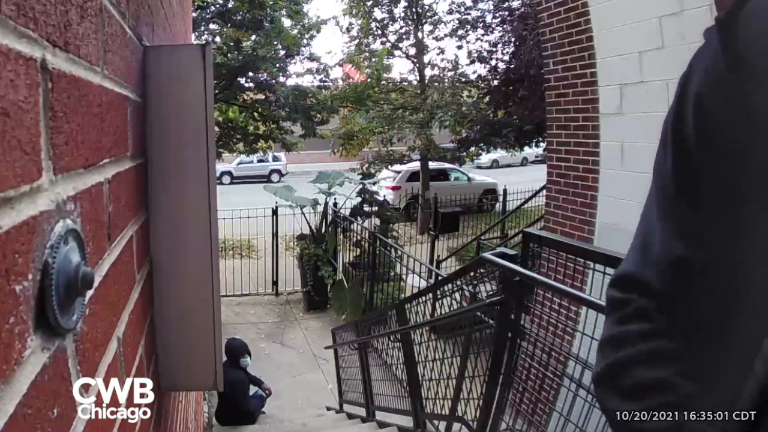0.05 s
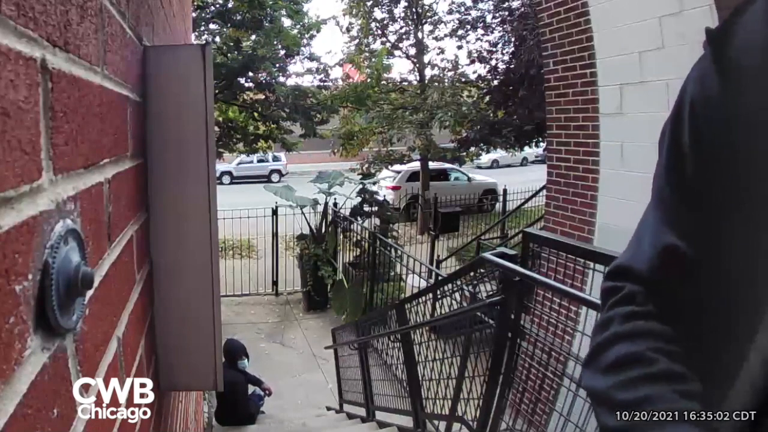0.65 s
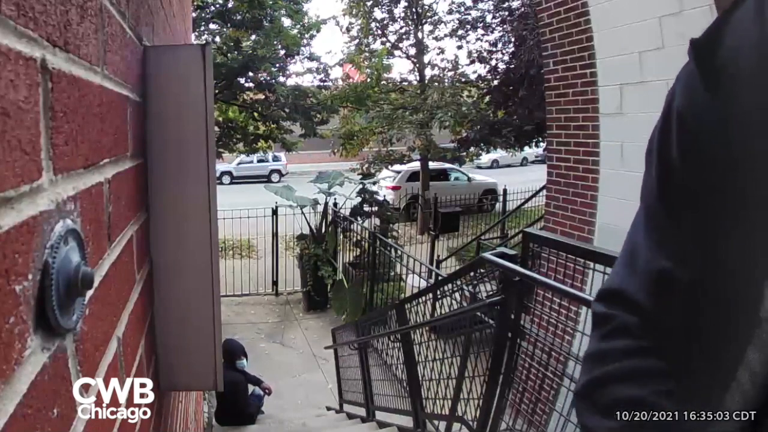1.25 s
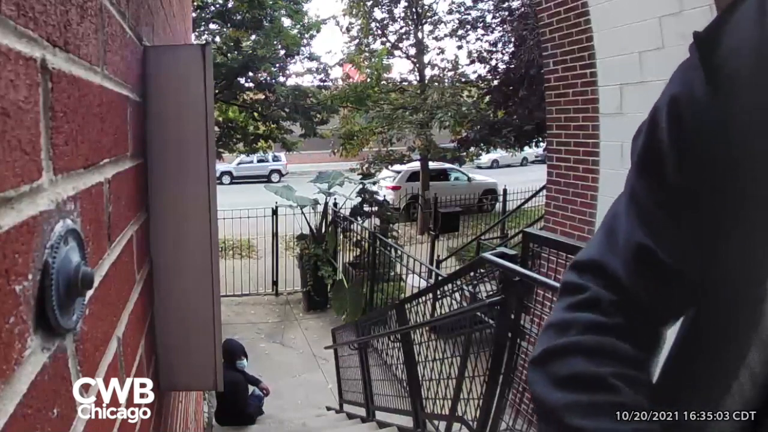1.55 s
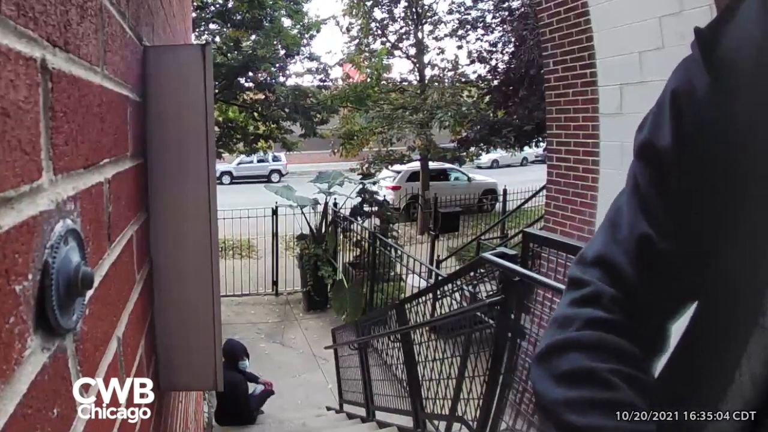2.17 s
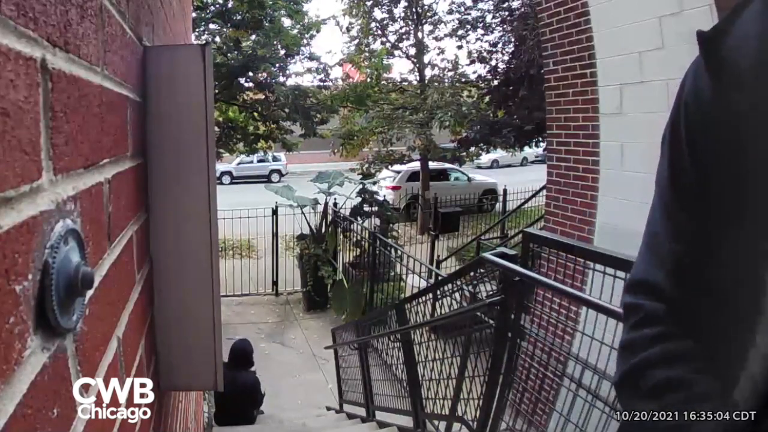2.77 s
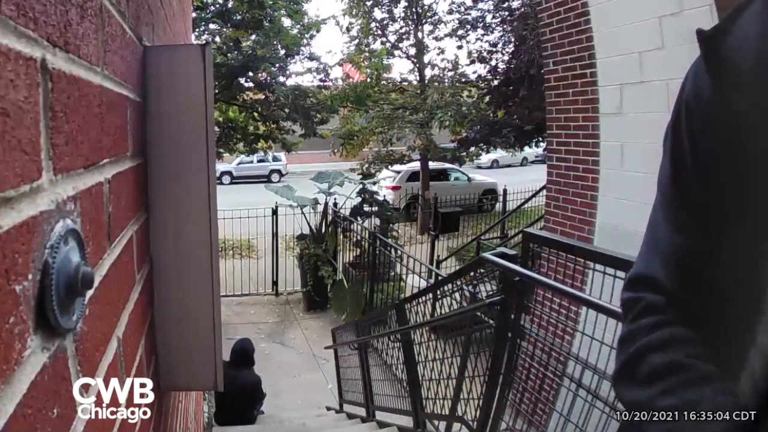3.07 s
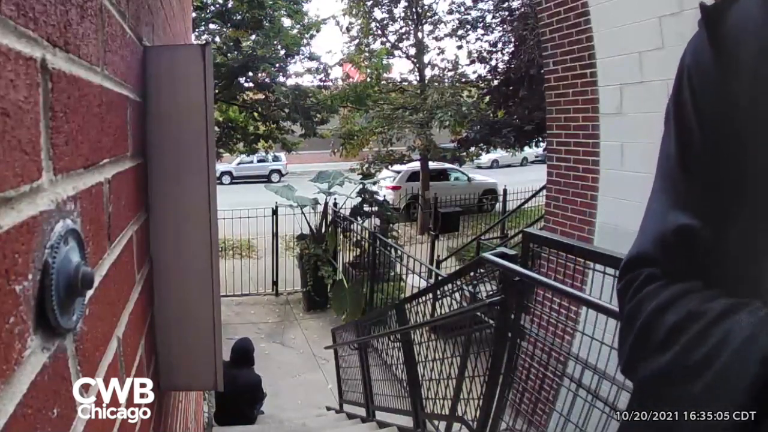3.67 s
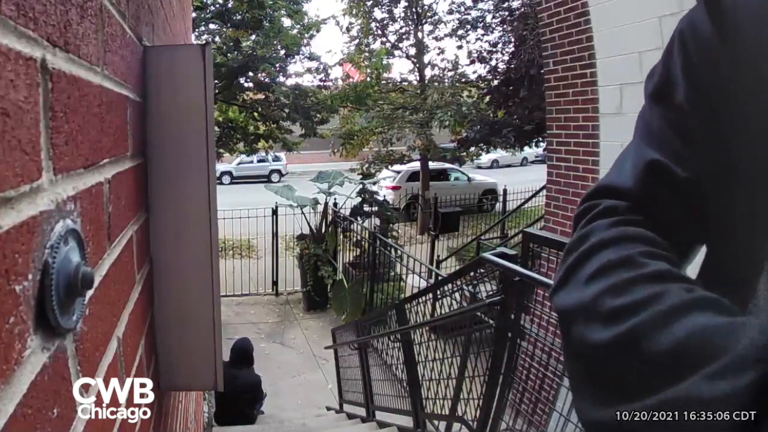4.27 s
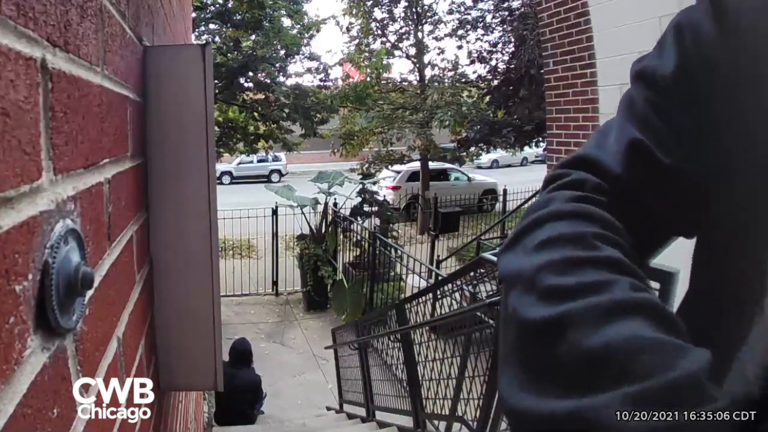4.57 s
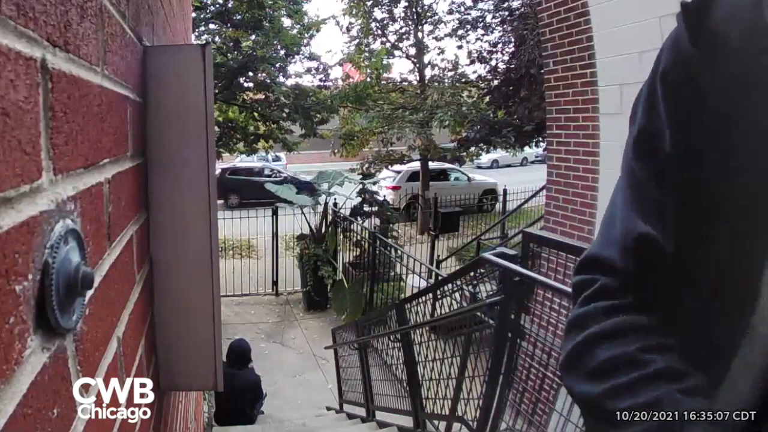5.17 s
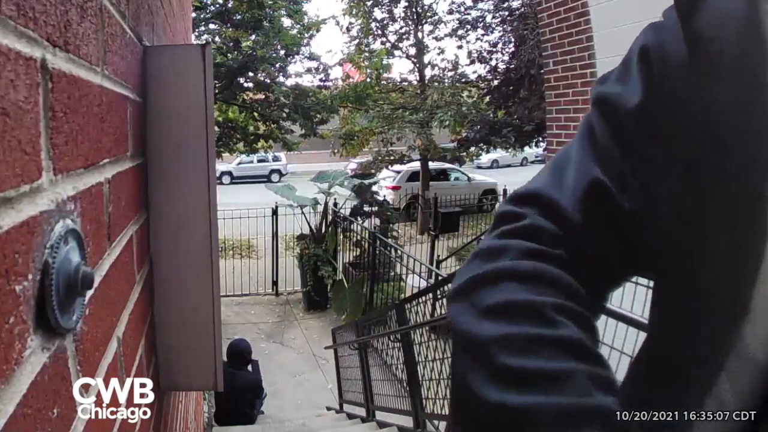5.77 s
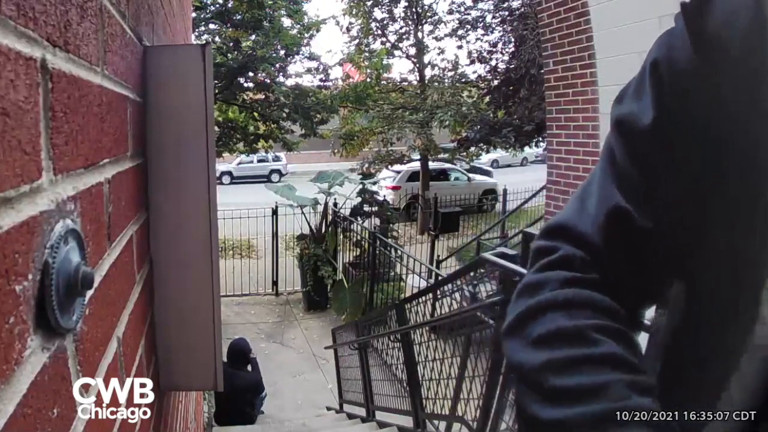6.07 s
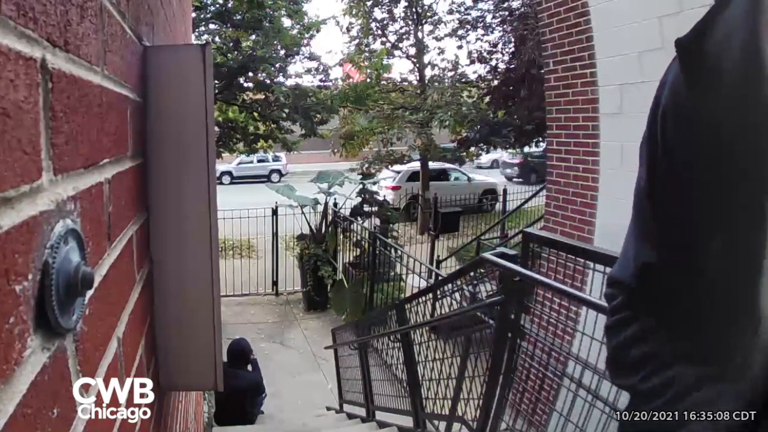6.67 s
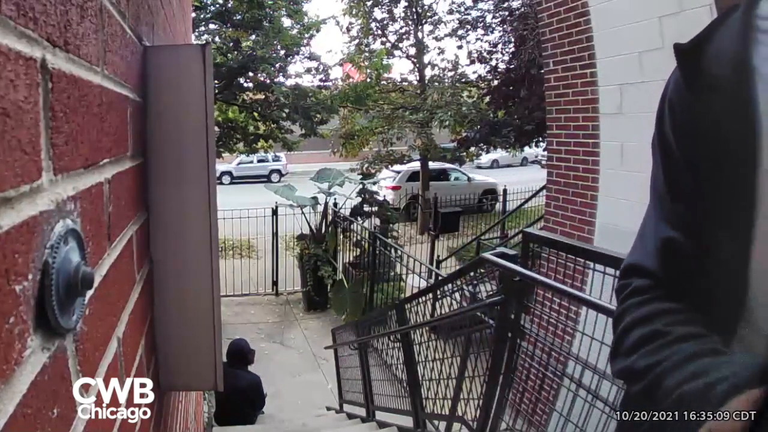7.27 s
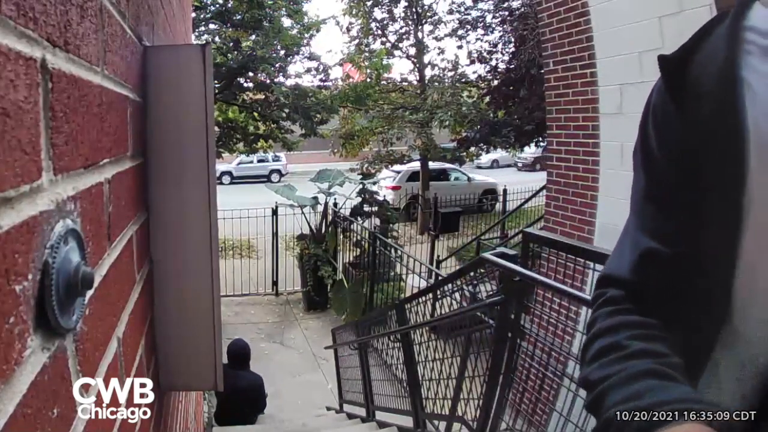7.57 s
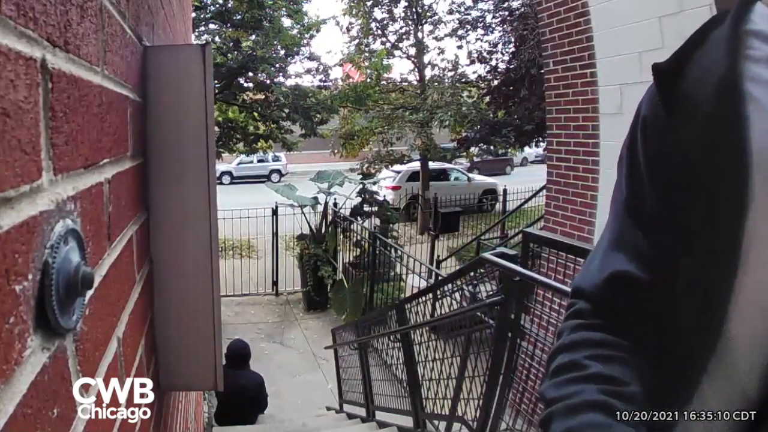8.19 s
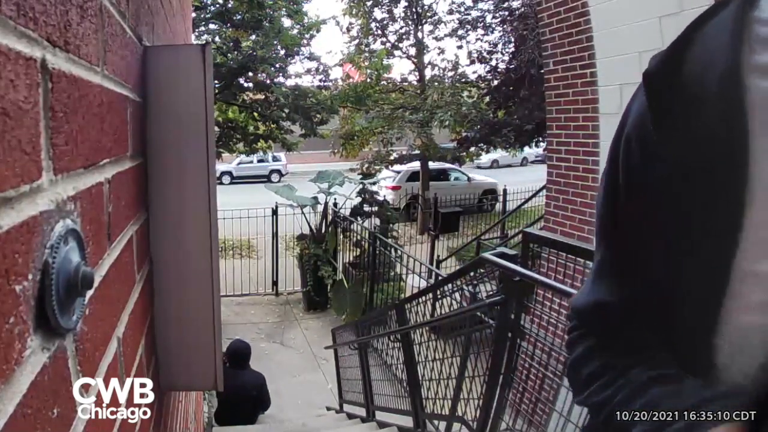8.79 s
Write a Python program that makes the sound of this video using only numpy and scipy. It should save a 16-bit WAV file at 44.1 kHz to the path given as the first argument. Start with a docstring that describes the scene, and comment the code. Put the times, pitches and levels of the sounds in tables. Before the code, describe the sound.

Someone forces a door outdoors with a steel bar, heard from very near. The tool slips with loud metallic clacks and wooden knocks, creaks once, and the door thuds lightly in its frame. After a short pause a second run of snaps and rasping scrapes begins, while a car goes by over low traffic noise. Toward the end only small ticks, a soft rustle of clothing and a distant engine remain.

```python
"""Brick porch, close to a small door camera: a steel pry bar is worked into a house door.
The bar snaps, skids and once creaks against lock and frame; each slip rings the steel and knocks the door.
In between, the bar scrapes, the door leaf bumps, and soft hiss swells: cloth rustle, wash after loud snaps.
Behind it, street traffic roars and hisses: a car passes, and an engine drones toward the end."""
import sys
import numpy as np
from scipy import signal
from scipy.fft import rfft, irfft, next_fast_len
from scipy.io import wavfile
from scipy.ndimage import uniform_filter1d, map_coordinates

SR = 44100
rng = np.random.default_rng(int(sys.argv[2]) if len(sys.argv) > 2 else 0)


def master(y):
    """Save y as 16-bit WAV."""
    cut = np.clip(np.atleast_2d(y).T, -1, 1)
    pcm = np.round(cut * 32767)  # scale
    wavfile.write(sys.argv[1], SR, pcm.astype(np.int16))


N = 398399

# spectrum of one bar contact: f/contact pitch, level/dB
CLACK_SPECTRUM = [(.2, -55.5), (0.421, -18.5), (.6, -2), (0.8, 3), (1.001, 5), (1.4, -1.5), (1.901, -8.5),
                  (2.6, -24.5), (4, -45.5)]


def amp(db):
    """Decibels to gain."""
    return 10 ** (np.asarray(db) / 20)


def unit(x):
    """Scale to rms 1."""
    return x / np.sqrt(np.mean(x ** 2) + 1e-20)


def burst(x, db):
    """Give x the energy of 10 ms at this level."""
    return amp(db) * x / np.sqrt(np.sum(x ** 2) / (SR / 100) + 1e-20)


def along(points, hz):
    """Read (f/Hz, value) points on a log axis."""
    f, values = np.transpose(points)
    return np.interp(np.log(np.maximum(hz, f[0])), np.log(f), values)


def curve(points):
    """Read (t/s, value) points at every sample."""
    return np.interp(np.arange(N) / SR, *np.transpose(points))


def swell(at_s, length_s):
    """Bell-shaped rise and fall."""
    return np.exp(-2 * ((np.arange(N) / SR - at_s) / length_s) ** 2)


def wobble(rate_hz):
    """Smooth curve through random knots."""
    knots = rng.standard_normal(int(N * rate_hz / SR) + 4)
    return map_coordinates(knots, [np.arange(N) * rate_hz / SR])


def add(track, at_s, sound):
    """Mix a sound into the track."""
    part = track[max(round(at_s * SR), 0):][:len(sound)]
    part += sound[:len(part)]


def filtered(x, response):
    """Multiply the spectrum of x by response(f/Hz)."""
    size = next_fast_len(len(x) + SR // 8)
    return irfft(rfft(x, size) * response(np.fft.rfftfreq(size, 1 / SR)), size)[:len(x)]


def coloured(x, spectrum, scale=1, size=2048):
    """Minimum-phase filter shaped like the spectrum, its frequencies times scale."""
    gain = amp(along(spectrum, np.fft.rfftfreq(size, 1 / SR) / scale))
    cepstrum = irfft(np.log(gain))
    cepstrum[1:size // 2] *= 2
    cepstrum[size // 2 + 1:] = 0
    return signal.fftconvolve(x, irfft(np.exp(rfft(cepstrum))))[:len(x)]


def rush(spectrum, patchy_db):
    """Shaped noise of rms 1 with drifting patches of gain."""
    bins = signal.stft(rng.standard_normal(N), nperseg=1024)[2]
    patches = uniform_filter1d(rng.standard_normal(bins.shape), size=5, axis=0)
    patches = uniform_filter1d(patches, size=9, axis=1)
    noise = signal.istft(bins * amp(patchy_db * unit(patches)), nperseg=1024)[1][:N]
    return unit(filtered(noise, lambda hz: amp(along(spectrum, hz))))


def porch(x, wet_db):
    """Add the short tail between the brick walls."""
    # reverberation time: f/Hz, t60/s
    decay = [(150, .45), (600, 0.06), (2500, 0.29), (7000, 0.39)]
    hz, t, bins = signal.stft(rng.standard_normal(len(x)), SR, nperseg=256)
    tail = signal.istft(bins * amp(-60 * t / along(decay, hz)[:, None]), SR, nperseg=256)[1]
    return x + amp(wet_db) * signal.fftconvolve(x, tail / np.linalg.norm(tail))[:len(x)]


def street():
    """Road roar and tyre hiss of far traffic; one car crosses in front with a brighter roar."""
    # far roar and hiss, one list before the car and one after: t/s, level/dB
    far_roar = [
        [(0.0, -59), (0.64, -70), (1.67, -62), (2.0, -66), (4.7, -62)],
        [(6.1, -60.5), (6.24, -58.5), (7.86, -58), (8.14, -62), (9.03, -56)],
    ]
    far_hiss = [
        [(0.0, -63), (0.68, -74), (1.5, -66.5), (1.84, -69.5), (2.85, -60.5), (3.27, -70.5), (4.1, -63.5)],
        [(6.3, -63.5), (6.68, -60), (6.86, -65.5), (7.79, -70), (8.12, -66), (8.63, -68.5), (9.03, -61.5)],
    ]
    # spectra of far roar, near car and tyres: f/Hz, level/dB
    roar_spectrum = [(15, -51), (25, -23), (52, -13.5), (65, -15.5), (79, -9.5), (97, -17), (129, -11.5),
                     (206, -15.5), (240, -17.5), (356, -0.5), (493, 1.5), (706, -4.5), (824, -3.5),
                     (1330, -22.5), (1500, -21.5), (1950, -38.5), (3300, -120)]
    car_spectrum = [(200, -33), (400, 5.5), (800, 6), (1100, 0), (1500, -28), (3000, -66)]
    tyre_spectrum = [(700, -8), (1300, 2), (1800, 6), (2600, -1.5), (3600, -15), (6000, -36.5)]
    abreast_s, half_gain_s, car_roar_db, car_hiss_db = 5.37, 0.41, -48, -52.5
    near = 1 / (1 + ((np.arange(N) / SR - abreast_s) / half_gain_s) ** 2)
    roar = amp(curve(np.concatenate(far_roar))) * rush(roar_spectrum, patchy_db=0.5)
    roar += amp(car_roar_db) * near * rush(car_spectrum, patchy_db=0.5)
    hiss_gain = np.hypot(amp(curve(np.concatenate(far_hiss))), amp(car_hiss_db) * near ** 3.5)
    waver = amp(1.1 * wobble(12))
    return waver * roar + hiss_gain * rush(tyre_spectrum, patchy_db=1.5)


def whines():
    """Exhaust boom, engine whine and brake squeal: wavering tones that swell and fade."""
    # street tones: centre t/s, length/s, f/Hz, width/Hz, level/dB
    tones = [(2.1, .04, 1660, 45, -60.5), (2.266, 0.066, 1714, 44, -57.5), (2.746, 0.43, 1700, 91, -65),
             (2.847, 0.33, 1885, 106, -61), (3.277, 0.17, 169, 9.1, -67), (5.771, 0.39, 161.8, 7.4, -62.5),
             (7.653, 0.14, 192.5, 9.3, -61), (8.505, 0.78, 487.3, 15.4, -58),
             (8.802, 0.55, 423.5, 25.7, -59)]
    out = np.zeros(N)
    for at_s, length_s, hz, width_hz, db in tones:
        phase = 2 * np.pi * np.cumsum(hz + width_hz / 2 * wobble(2 * width_hz)) / SR
        flutter = amp(2.5 * wobble(width_hz))
        out += amp(db) * flutter * swell(at_s, length_s) * np.sin(phase)
    return out


def engine():
    """An engine draws near: harmonics of its firing rate waver in pitch and strength."""
    # approach: t/s, level/dB
    approach = [(6.3, -88.5), (6.9, -65), (7.35, -73.5), (7.65, -64.5), (8.15, -74.5), (8.55, -65.5),
                (9.03, -65)]
    # harmonics: f/firing rate, level/dB
    orders = [(1, -3.5), (2, -6), (3, -9)]
    firing_hz = 65.7
    db = curve(approach)
    phase = 2 * np.pi * np.cumsum(firing_hz * (1 + 0.022 * wobble(14))) / SR
    return np.sqrt(2) * sum(amp(db + level + 2 * wobble(36)) * np.sin(k * phase) for k, level in orders)


def rustle_and_wash():
    """Soft high hiss swells: cloth rustle, and the wash lingering after loud snaps."""
    # hiss swells: centre t/s, length/s, level/dB
    swells = [(0, 0.35, -74.5), (1.647, 0.15, -58), (3.943, 0.41, -77.5), (4.55, 0.64, -70),
              (5.254, 0.46, -62), (6.593, 0.75, -69), (7.373, 0.37, -68), (8.004, 0.39, -58.5),
              (8.45, 0.73, -73.5), (9.03, 0.16, -68.5)]
    # hiss spectrum: f/Hz, level/dB
    hiss_spectrum = [(1800, -13.5), (3300, 4.5), (4000, 2.5), (5000, -1.5), (6300, -4), (7900, -10.5),
                     (15000, -23.5)]
    floor_db = -80.5
    swell_power = sum((amp(db) * swell(at_s, length_s)) ** 2 for at_s, length_s, db in swells)
    envelope = np.sqrt(amp(floor_db) ** 2 + swell_power)
    return envelope * amp(1.2 * wobble(25)) * rush(hiss_spectrum, patchy_db=1.5)


def door_bumps():
    """The door leaf settles against its frame with a thud and hums in its main mode."""
    # hollow bumps: t/s, hum/dB, thud/dB
    bumps = [(2.809, -52.5, -62), (3.03, -50, -49.5), (3.445, -45.5, -58.5)]
    # thud spectrum: f/Hz, level/dB
    thud_spectrum = [(25, -30), (70, -2), (160, -3.5), (260, -1.5), (400, 5), (900, -34.5)]
    mode_hz, hum_t60_s, hum_rise_s, thud_t60_s = 428, 0.092, 0.0026, 0.16
    out, t = np.zeros(N), np.arange(SR // 2) / SR
    hum = np.sin(2 * np.pi * mode_hz * t) * amp(-60 * t / hum_t60_s) * (1 - np.exp(-t / hum_rise_s))
    for at_s, hum_db, thud_db in bumps:
        thud = coloured(rng.standard_normal(len(t)) * amp(-60 * t / thud_t60_s), thud_spectrum)
        add(out, at_s, burst(hum, hum_db) + burst(thud, thud_db))
    return out


def bar_scrapes():
    """Steel dragged over the frame: a swell of tiny uneven slips, too blunt for much treble."""
    # drags: centre t/s, length/s, level/dB, pitch/Hz
    drags = [(0.193, 0.04, -57.5, 3120), (2.354, 0.089, -47.5, 2490), (4.346, 0.014, -47.5, 5570),
             (4.539, 0.012, -35.5, 4400), (5.02, 0.045, -40.5, 3340), (5.171, 0.028, -39.5, 2930),
             (5.785, 0.027, -44, 3330), (6.183, 0.065, -54, 2760), (7.347, 0.058, -51, 2520),
             (7.353, 0.06, -51, 810), (8.091, 0.074, -54, 5280)]
    out, t = np.zeros(N), np.arange(SR * 2 // 5) / SR
    for at_s, length_s, db, pitch_hz in drags:
        stroke = np.sin(np.pi * np.minimum(t / (2 * length_s), 1)) ** 4
        slips = rng.standard_normal(len(t)) * amp(3.3 * rng.standard_normal(len(t)))
        rasp = coloured(slips, CLACK_SPECTRUM, pitch_hz)
        blunt = filtered(rasp, lambda hz: 1 / (1 + (hz / (1.9 * pitch_hz)) ** 8))
        add(out, at_s - length_s, porch(amp(db) * stroke * unit(blunt), wet_db=-9.5))
    return out


def steel(x):
    """Bar and lock plate ring briefly, at new strengths for every contact."""
    # resonances: f/Hz, width/Hz, level/dB
    modes = [(1560, 90, -6), (1920, 70, -5), (2260, 70, -5), (2400, 70, -6), (2720, 80, -4), (3030, 70, -4),
             (3310, 70, -3), (3570, 70, -4), (4050, 70, -2), (4660, 70, -1), (5980, 80, 0), (6850, 80, -3)]
    ring_db, spread_db = -1, 2.4
    gains = amp(ring_db + rng.normal(0, spread_db, len(modes)))
    return filtered(x, lambda f: 1 + sum(
        gain * amp(db) * 1j * f * width_hz / (hz * hz - f * f + 1j * f * width_hz)
        for gain, (hz, width_hz, db) in zip(gains, modes)))


def contact(t, t60_s, echo_s, echo_db, scatter_db, creep_db):
    """One slip at t = 0: the tip creeps, lets go, and the doorway throws the snap back."""
    snap = np.zeros(len(t))
    snap[np.searchsorted(t, 0)] = 1
    snap[np.searchsorted(t, echo_s + rng.normal(0, 0.0002))] = amp(echo_db)
    doorway = (t > 0) / (1 + (t / 0.025) ** 4)  # reflections crowd in early, then thin out
    scatter = rng.standard_normal(len(t)) * doorway * amp(-60 * np.abs(t) / t60_s)
    creep = rng.standard_normal(len(t)) * (t < 0) * amp(-60 * np.abs(t) / 0.009)
    return burst(snap, 0) + burst(scatter, scatter_db) + burst(creep, creep_db)


def creak_slips():
    """The bar sticks and slips ever more slowly as its load eases; the strength swells and fades."""
    start_s, start_rate_hz, ease_s, pitch_hz = 2.331, 137.2, 0.0584, 2550
    middle_db, ends_rel_db, edge_rel_db, knock_rel_db = -36.5, -13.5, -24.5, -26
    count = start_rate_hz * ease_s
    k = np.arange(int(count))
    times_s = start_s - ease_s * np.log(1 - k / count)
    clacks_db = middle_db + ends_rel_db * np.abs(np.linspace(-1, 1, len(k))) ** 6
    return [(at_s, db, pitch_hz, db + edge_rel_db, db + knock_rel_db)
            for at_s, db in zip(times_s, clacks_db)]


def skid_slips():
    """The tip skids in a few evenly spaced slips, each a step louder or softer than the last."""
    # skids: t/s, slip count, gap/s, step/dB, clack/dB, pitch/Hz, edge/dB, knock/dB
    skids = [(0.3552, 2, .029, -8, -47, 2700, -53.5, -59.5),
             (1.228, 2, 0.0084, -2, -27.5, 2390, -52.5, -45.5),
             (1.246, 3, 0.0053, 1, -30, 2440, -52.5, -41.5),
             (1.533, 2, .0095, -13.5, -23, 2040, -45, -43.5), (1.703, 3, 0.0093, -6, -31.5, 2880, -41, -49),
             (3.017, 2, 0.017, -7.5, -39, 2807, -62, -48), (4.348, 2, .0246, -13, -37, 3100, -45.5, -55),
             (4.539, 2, 0.031, -11.5, -36.5, 3780, -40, -55),
             (5.0099, 3, 0.013, 2, -42.5, 2680, -53.5, -47), (6.157, 2, 0.024, -4, -31, 2730, -42, -52),
             (7.436, 3, 0.014, -3.5, -38.5, 3200, -49, -53)]
    return [(at_s + k * gap_s, clack_db + k * step_db, pitch_hz,
             edge_db + k * step_db, knock_db + k * step_db)
            for at_s, count, gap_s, step_db, clack_db, pitch_hz, edge_db, knock_db in skids
            for k in range(round(count))]


def pry_bar():
    """Each slip gives a clack, a bright gritty steel edge and a duller knock of the door leaf."""
    # single snaps: t/s, clack/dB, pitch/Hz, edge/dB, knock/dB
    snaps = [(0.2985, -22, 2820, -36.5, -53.5), (0.822, -68.5, 2260, -73, -65),
             (1.156, -52, 3320, -55.5, -61), (1.279, -23.5, 2560, -39.5, -40),
             (1.347, -22, 2560, -33.5, -43.5), (1.365, -56, 2810, -57, -49),
             (1.5245, -35.5, 2960, -24, -36.5), (1.6095, -22.5, 1850, -36.5, -40.5),
             (1.962, -53, 2190, -67, -68.5), (2.7652, -45.5, 2670, -89, -72),
             (4.187, -25.5, 2160, -50.5, -47.5), (4.2183, -26.5, 2110, -51, -46.5),
             (4.314, -54.5, 1930, -50, -65), (4.4125, -34, 2680, -33.5, -57),
             (5.137, -26, 2570, -35.5, -42.5), (5.169, -33.5, 2500, -44.5, -41),
             (5.2146, -25, 2340, -40, -45), (5.355, -24.5, 2470, -43.5, -36.5),
             (5.782, -35.5, 2900, -49, -43), (6.1025, -48, 2700, -59, -65),
             (6.123, -32.5, 2830, -43.5, -55.5), (6.218, -34, 2960, -44.5, -70),
             (7.759, -50.5, 5000, -50.5, -72), (8.16, -53, 4960, -48, -60), (9.005, -54, 1950, -74, -57.5)]
    # spectra of steel edge and door knock: f/Hz, level/dB
    edge_spectrum = [(2500, -40.5), (4200, 1.5), (5000, -1), (5900, 0), (7200, -7.5), (9000, -16),
                     (15000, -31)]
    door_spectrum = [(30, -28), (90, -19.5), (250, -19.5), (400, 0), (700, 4.5), (1100, -1.5), (1700, -9.5),
                     (3500, -56)]
    hard_db, hard_t60_s, db_per_doubling = -28.5, 0.035, 29  # softer slips linger
    frame_cutoff_hz, leaf_rise_s, leaf_t60_s = 4700, 0.003, 0.08
    out, lead = np.zeros(N), SR // 100
    t = (np.arange(SR * 2 // 5) - lead) / SR
    wooden_frame = signal.butter(6, frame_cutoff_hz, fs=SR, output="sos")
    leaf_motion = np.clip(t / leaf_rise_s, 0, 1) * amp(-60 * np.abs(t) / leaf_t60_s)
    for at_s, clack_db, pitch_hz, edge_db, knock_db in list(snaps) + skid_slips() + creak_slips():
        t60_s = hard_t60_s * 2 ** ((hard_db - clack_db) / db_per_doubling)
        slip = steel(contact(t, t60_s, echo_s=0.0042, echo_db=-6.5, scatter_db=3.0, creep_db=-8.5))
        grit = steel(contact(t, t60_s, echo_s=0.0044, echo_db=-3.5, scatter_db=12.0, creep_db=-11.5))
        clack = burst(signal.sosfilt(wooden_frame, coloured(slip, CLACK_SPECTRUM, pitch_hz)), clack_db)
        edge = burst(coloured(grit, edge_spectrum), edge_db)
        shudder = rng.standard_normal(len(t)) * leaf_motion
        knock = burst(coloured(shudder, door_spectrum), knock_db)
        add(out, at_s - lead / SR, porch(clack + edge, wet_db=-21.0) + porch(knock, wet_db=-1.0))
    return out


def scene():
    """All sources, mono."""
    door = pry_bar() + bar_scrapes() + door_bumps()
    return (door + street() + engine() + whines() + rustle_and_wash())[None]


def record(dry):
    """The camera passes little above 8 kHz and rounds off the hardest snaps."""
    # microphone response: f/Hz, level/dB
    microphone = [(7700, -0.5), (8050, -4.5), (8350, -27), (15000, -35)]
    ceiling, top_hz = amp(-2.5), 15200
    heard = filtered(dry[0], lambda hz: amp(along(microphone, hz)))
    rounded = ceiling * np.tanh(heard / ceiling)
    return filtered(rounded, lambda hz: hz < top_hz)[None]


dry = scene()
out = record(dry)
master(out)
```